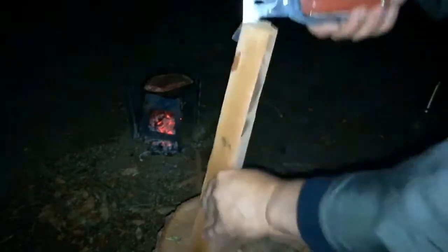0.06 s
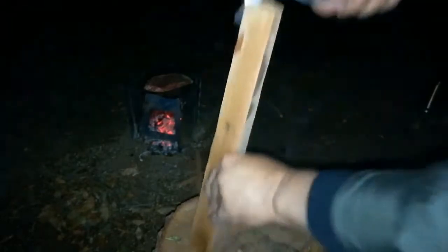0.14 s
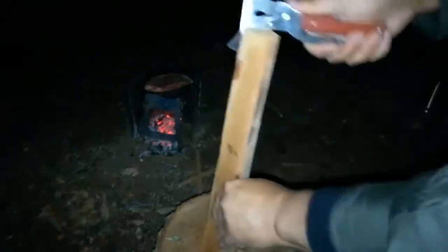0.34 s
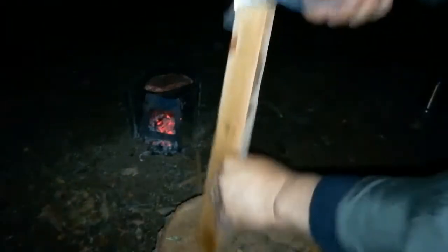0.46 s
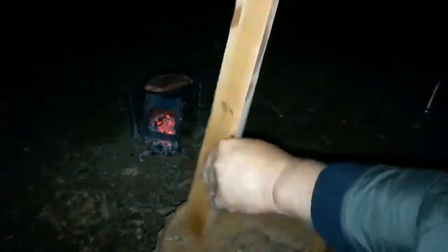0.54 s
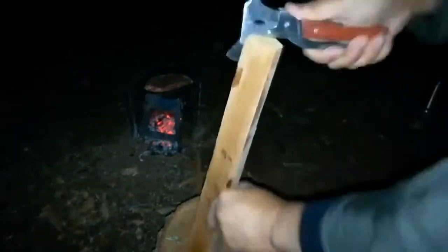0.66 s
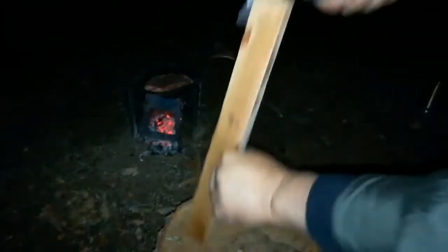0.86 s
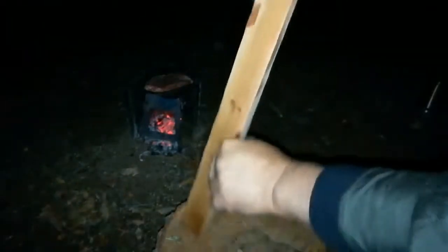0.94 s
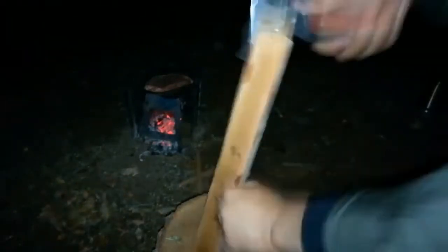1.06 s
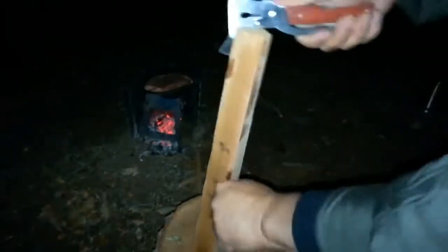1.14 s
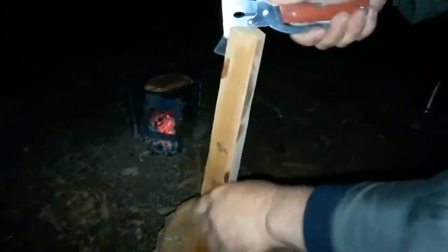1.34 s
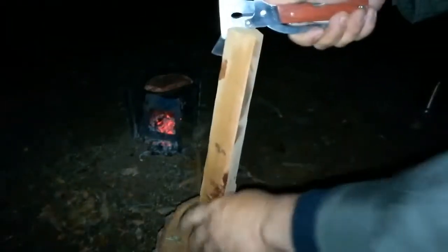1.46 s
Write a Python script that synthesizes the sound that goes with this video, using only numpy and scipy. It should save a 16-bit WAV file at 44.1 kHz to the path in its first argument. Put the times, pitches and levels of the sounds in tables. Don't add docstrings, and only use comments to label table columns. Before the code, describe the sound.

Three hard wooden knocks of a hatchet-split stick on a stump, outdoors, close and overloaded

```python
import sys
import numpy as np
from scipy import signal
from scipy.io import wavfile
from scipy.ndimage import uniform_filter1d, minimum_filter1d

SR = 44100
rng = np.random.default_rng(int(sys.argv[2]) if len(sys.argv) > 2 else 0)


def master(y):
    cut = np.clip(np.atleast_2d(y).T, -1, 1)
    pcm = np.round(cut * 32767)
    wavfile.write(sys.argv[1], SR, pcm.astype(np.int16))


def volts_from_db(level):
    exponent = np.asarray(level, float) / 20
    return 10 ** exponent


N = 66150
RUSTLE_PATCHY_DB = 1.5


def evened(x):
    return x / np.sqrt(np.mean(x ** 2) + 1e-20)


def read(points, hz):
    f, value = np.transpose(points)
    return np.interp(np.log(hz + 1), np.log(f + 1), value)


def curve(points):
    t, value = np.transpose(points)
    return np.interp(np.arange(N) / SR, t, value)


def add(mix, start_s, sound):
    at = round(start_s * SR)
    sound = sound[:, max(-at, 0):]
    part = mix[:, max(at, 0):][:, :sound.shape[1]]
    part += sound[:, :part.shape[1]]


def noise(length, field_db, same, patchy_db, size=256):
    hop = size // 4
    frames = length // hop + 5
    hz = np.fft.rfftfreq(size, 1 / SR)[:, None]
    a, b, c, d, patch = rng.standard_normal((frames, len(hz), 5)).T
    patch = uniform_filter1d(patch, size=3, axis=0)
    patch = evened(uniform_filter1d(patch, size=5, axis=1))
    same = np.clip(same, 0, 1)
    left = a + 1j * b
    right = same * left + np.sqrt(1 - same ** 2) * (c + 1j * d)
    z = np.array([left, right])
    z *= volts_from_db(field_db(hz, np.arange(frames) * hop / SR) + patchy_db * patch)
    return signal.istft(z, nperseg=size, noverlap=size - hop)[1][:, :length]


# frequency in Hz, density in dB per Hz.
LEAF_SPECTRUM = [(200, -15.5), (400, -3), (700, 2.5), (1250, 5), (2500, -2), (4000, -1.5), (8000, -2),
                 (9500, -10.5)]
# time in seconds, level in dB.
LEAF_LEVEL = [(0.0, -62), (0.228, -64.5), (0.38, -67.5), (0.61, -73.5), (0.78, -75), (0.98, -79),
              (1.148, -76), (1.31, -73.5), (1.5, -85)]


def air():
    hiss = noise(N, lambda hz, t: read(LEAF_SPECTRUM, hz) + 0 * t, 0.39, RUSTLE_PATCHY_DB, size=512)
    return volts_from_db(curve(LEAF_LEVEL)) * evened(hiss)


# frequency in Hz, density in dB per Hz.
WIND_SPECTRUM = [(10, -32.5), (20, -8), (45, 4.5), (90, -2.5), (140, -15), (200, -26.5), (300, -32),
                 (500, -54)]
# time in seconds, level in dB.
GUSTS = [(0.0, -36), (0.028, -51.5), (0.232, -42), (0.304, -51.5), (0.408, -38), (0.542, -46.5),
         (0.604, -32), (0.638, -48.5), (0.806, -40.5), (0.83, -50.5), (0.902, -33.5), (0.94, -43),
         (0.986, -31), (1.402, -43.5), (1.416, -42), (1.5, -49.5)]
# middle in seconds, level in dB, width in seconds.
EDDIES = [(0.166, -37.5, 0.00538), (0.899, -34.5, 0.00437), (1.069, -33, 0.00253), (1.107, -41, 0.002215),
          (1.178, -29.5, 0.00352), (1.252, -51, 0.0042), (1.269, -36.5, 0.0055), (1.421, -34, 0.00653)]


def wind():
    same, patchy_db, lump = 0.92, 2, 0.18
    x = evened(noise(N, lambda hz, t: read(WIND_SPECTRUM, hz) + 0 * t, same, patchy_db, size=2048))
    x = x - lump * (x ** 2 - 1)
    x = x * volts_from_db(curve(GUSTS) - 6.0)
    t = np.arange(N) / SR
    for middle_s, db, width_s in EDDIES:
        u = (t - middle_s) / width_s
        x -= volts_from_db(db) * (1 - 2 * u ** 2) * np.exp(-u ** 2)
    return signal.sosfiltfilt(signal.butter(2, 18, "high", fs=SR, output="sos"), x)


# middle in seconds, length in seconds, level in dB, colour in Hz.
BRUSH_STROKES = [(0.171, 0.033, -72.5, 1266), (0.487, 0.051, -80.5, 1390), (0.555, 0.042, -82.5, 3600),
                 (1.11, 0.025, -71, 1052), (1.298, 0.0306, -80, 990), (1.283, 0.053, -85.5, 3940)]


def brush():
    def field(hz, t):
        power = 1e-20
        for middle_s, length_s, db, colour_hz in BRUSH_STROKES:
            swish = np.exp(-((t - middle_s) / length_s) ** 2)
            band = 1 / (1 + ((hz - colour_hz) / (0.09 * colour_hz)) ** 4)
            power = power + volts_from_db(2 * db) * swish * band
        return 10 * np.log10(power)
    return noise(N, field, 0.24, RUSTLE_PATCHY_DB, size=512)


def tick(db, colour_hz, pan_db):
    t = np.arange(1500) / SR
    puff = evened(noise(1500, lambda f, s: -6 * np.log2((f + 50) / colour_hz) ** 2 + 0 * s, 0.27, patchy_db=-2))
    click = volts_from_db(db - 60 * t / 0.0045)
    tail = volts_from_db(db - 9.5 - 60 * t / 0.039)
    return puff * (click + tail) * volts_from_db([[pan_db / 2], [-pan_db / 2]])


EMBER_TIMES = [0.195, 0.4915, 1.468]
# level in dB, colour in Hz, left minus right in dB.
EMBERS = [
    (-54.5, 3000, 2.73),
    (-48.5, 4000, 4),
    (-57, 10000, -10.37),
]


def embers(mix):
    for start_s, ember in zip(EMBER_TIMES, EMBERS):
        add(mix, start_s, tick(*ember))


# frequency in Hz, density in dB per Hz.
SCATTER_SPECTRUM = [(120, -36.5), (200, -9), (514, -2.5), (1200, -2), (3570, -12), (4200, -15.5),
                    (4940, -8.5), (8590, -16.5), (9780, -56), (12700, -83.5), (21500, -120)]
# frequency in Hz, width in Hz, then level in dB for each of three knocks.
SCATTER_RINGS = [(890, 150, 4.5, 2.5, 6), (2100, 350, 7, 8.5, 5), (3600, 170, 10.5, 5.5, 7.5),
                 (4850, 170, 8, 13, 5.5), (5320, 80, 4, 7, 7), (6880, 150, 2, 4, 5)]
# frequency in Hz, 60 dB decay time in seconds.
NEAR_DECAY = [(300, 0.096), (1000, 0.053), (3000, .1), (8000, 0.074)]
# frequency in Hz, 60 dB decay time in seconds.
FAR_DECAY = [(300, 0.4), (1000, 0.3), (2100, 0.43), (5000, 0.42), (8000, 0.35)]


def echo(k, level_db, stretch, tilt_db):
    far_db, fade_db_per_s2 = -17, 94
    same, patchy_db, ring_grow_s, onset_s = 0.14, 3, 0.14, 0.0013

    def field(hz, t):
        rings = sum(db[k] / (1 + ((hz - f) / width) ** 2) for f, width, *db in SCATTER_RINGS)
        rings = rings * np.minimum(t / ring_grow_s, 1)
        near = volts_from_db(-120 * t / read(NEAR_DECAY, hz))
        far = volts_from_db(2 * far_db - 120 * t / read(FAR_DECAY, hz) / stretch)
        fade = fade_db_per_s2 * (t / stretch) ** 2
        tilt = tilt_db * np.log2((hz + 50) / 1500)
        return read(SCATTER_SPECTRUM, hz) + rings + 10 * np.log10(near + far) - fade - tilt

    x = noise(30000, field, same, patchy_db, size=512)
    x = x / np.sqrt(np.mean(x[:, :400] ** 2))
    return volts_from_db(level_db) * x * np.minimum(np.arange(30000) / SR / onset_s, 1)


# frequency in Hz, 60 dB decay time in seconds, then level in dB for each of three knocks.
MODES = [(356.6, .04, -21, -23, -21), (622, 0.016, -16, -21.5, -27.5), (815, .04, -23.5, -20, -25.5),
         (1224.3, 0.02632, 1.5, -7, -1.5), (1469.6, 0.029, -12.5, -9.5, -11), (1706.6, 0.023, -5, -8, -4.5),
         (2088.1, 0.034, -8.5, -9.5, -17.5), (2660, 0.017, -17.5, -16, -18.5),
         (3550.9, 0.022, -8.5, -7, -10), (4791.4, 0.006, -24.5, -16.5, -7),
         (4987.4, 0.022, -16.5, -7.5, -17.5), (5320, 0.0096, -20.5, -20, -16.5),
         (6805, .022, -27, -21, -19.5), (8871, 0.0051, -29, -16, -24)]
# frequency in Hz, left minus right in dB.
MODE_PAN = [(60, 6.0), (160, -2.5), (450, -8.5), (1240, 9.5), (3400, -7.5), (9330, -10.5)]
# frequency in Hz, angle between the microphones in radians.
MODE_PHASE = [(300, 2), (600, 0.4), (1200, 0.9), (2000, 1.6), (4000, 1.2), (8000, 1.5)]


def ring(k):
    t = np.arange(4000) / SR
    table = np.array(MODES)
    hz, t60, db = table[:, :1], table[:, 1:2], table[:, 2 + k:3 + k]
    side = np.array([.5, -.5])[:, None, None]
    phase = side * read(MODE_PHASE, hz) * np.minimum(t * hz, 1)
    waves = np.sin(2 * np.pi * hz * t + phase)
    swell_s = 0.0012 * hz / 5000
    swell = 1 - np.exp(-t / swell_s)
    level = volts_from_db(db + side * read(MODE_PAN, hz) - 60 * t / t60)
    return -(level * swell * waves).sum(1)


# frequency in Hz, density in dB per Hz.
CRACK_SPECTRUM = [(120, -43.5), (200, -16.5), (1320, -8.5), (3030, -11.5), (4860, -7), (5910, -12.5),
                  (8730, -17.5), (9780, -29.5), (12700, -63), (21500, -120)]
# delay in seconds, level in dB.
REFLECTIONS = [(.012, -19.5), (.0165, -25), (.026, -31), (.037, -34)]
# level in dB, decay factor, low tilt in dB per octave.
SCATTER = [(-21.5, 0.96, .5), (-20, 0.865, 1), (-27, 0.9685, .5)]


def knock(k, start_s, force_db, touch_db, lead_s, contact_s):
    rise_db, chatter_db, chatter_per_s = 9, -19, 6000
    crack_db, crack_t60 = -19, 0.025
    thud_db, thud_s = -11, 0.00044
    drop_db, drop_s = -18.5, 0.0021
    t = np.arange(2000) / SR - lead_s
    touch = touch_db + rise_db * t / lead_s
    grit = rng.standard_normal(2000) * (rng.random(2000) < chatter_per_s / SR)
    drive = grit * np.where(t < 0, volts_from_db(touch), volts_from_db(chatter_db) * (t < contact_s))
    drive[np.searchsorted(t, 0)] += 1
    body = signal.fftconvolve(drive[None], ring(k), axes=1)

    crack = evened(noise(2000, lambda hz, s: read(CRACK_SPECTRUM, hz) + 0 * s, 1.0, patchy_db=1.5))
    crack_decay = volts_from_db(-60 * np.maximum(t - contact_s, 0) / crack_t60)
    crack *= np.where(t < 0, volts_from_db(touch + 13), crack_decay)
    u = np.clip((t + .6 * thud_s) / thud_s, 0, 30)
    thud = volts_from_db(thud_db) * u * (2 - u) * np.exp(-u)
    body[:, :2000] += volts_from_db(crack_db) * crack - thud

    since = np.arange(body.shape[1]) / SR - lead_s - contact_s
    body *= volts_from_db(drop_db * np.clip(since / drop_s + .5, 0, 1))
    body = signal.sosfilt(signal.butter(5, 280, "high", fs=SR, output="sos"), body)

    out = np.zeros((2, 32000))
    add(out, 0, body)
    for j, (delay_s, db) in enumerate(REFLECTIONS):
        swapped = body[::(-1) ** j]
        add(out, delay_s * rng.uniform(.9, 1.2), volts_from_db(db - 11.5) * swapped)
    out *= volts_from_db(force_db)
    add(out, lead_s + 0.0027, echo(k, *SCATTER[k]))
    return start_s - lead_s, out


# blow in seconds, force in dB, first touch in dB, lead of the touch in seconds,
# contact length in seconds.
BLOWS = [
    (0.2110, 7, -26.5, .0055, .007),
    (0.5860, 11.5, -36, 0.005657, 0.0077),
    (0.9796, 5.5, -25.5, 0.0034, 0.0057),
]


def scene():
    duck_db, duck_s = -15, 0.007
    mix, duck, t = np.zeros((2, N)), np.zeros(N), np.arange(N) / SR
    for k, blow in enumerate(BLOWS):
        add(mix, *knock(k, *blow))
        duck += duck_db * np.exp(-((t - blow[0] + duck_s) / duck_s) ** 4)
    add(mix, -0.17, echo(len(BLOWS) - 2, -22.5, 1.3, .5))
    embers(mix)
    return mix + (wind() + air() + brush()) * volts_from_db(duck)


def top_cut(x):
    return signal.sosfilt(signal.butter(12, 9930, fs=SR, output="sos"), x)


def record(dry):
    edge_hz, limit_db, limit_s, ceiling = 9250, 4.5, 0.001, 1
    low_pass = signal.firwin(301, edge_hz, window=("kaiser", 8), fs=SR)
    x = signal.oaconvolve(dry, low_pass[None], "same")
    span = max(round(limit_s * SR), 3)
    peak = -minimum_filter1d(-abs(x), span, axis=1)
    peak = uniform_filter1d(peak, span, axis=1)
    x = x / np.maximum(peak / volts_from_db(limit_db), 1)
    x = x / (1 + abs(x / ceiling) ** 10) ** (1 / 10)
    return top_cut(x)


dry = scene()
out = record(dry)
master(out)
```